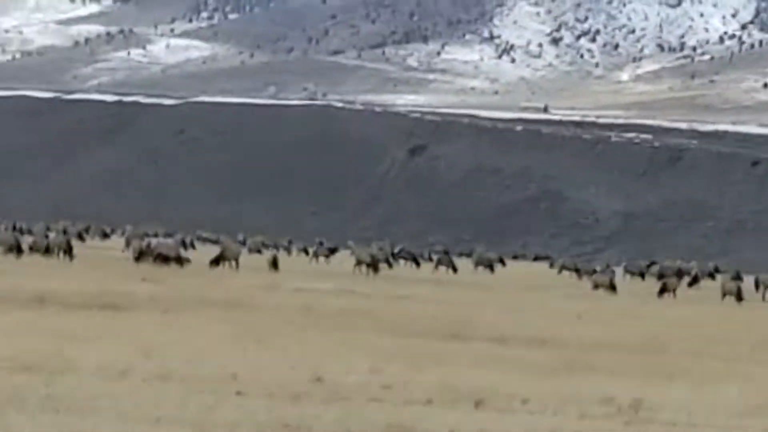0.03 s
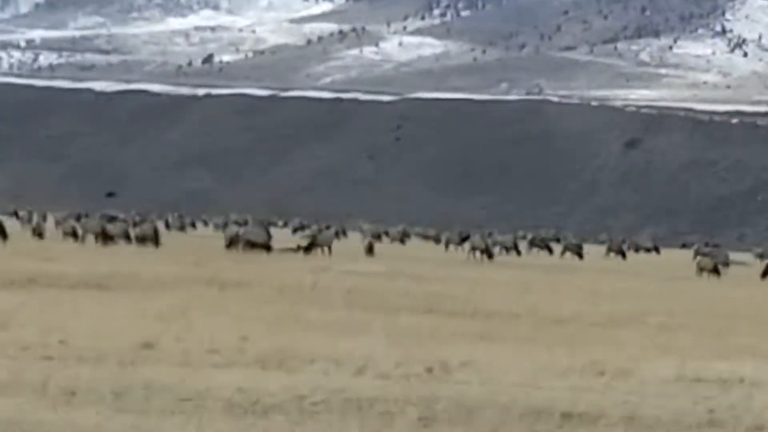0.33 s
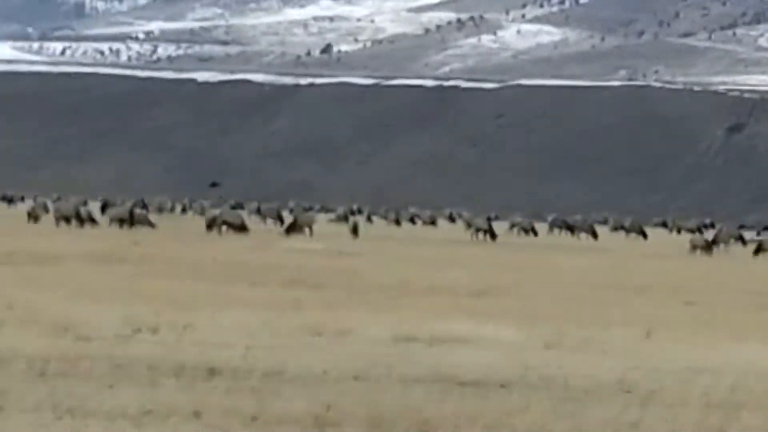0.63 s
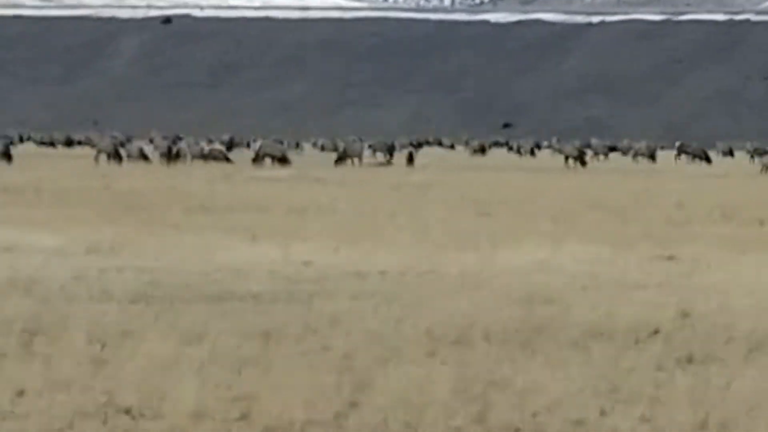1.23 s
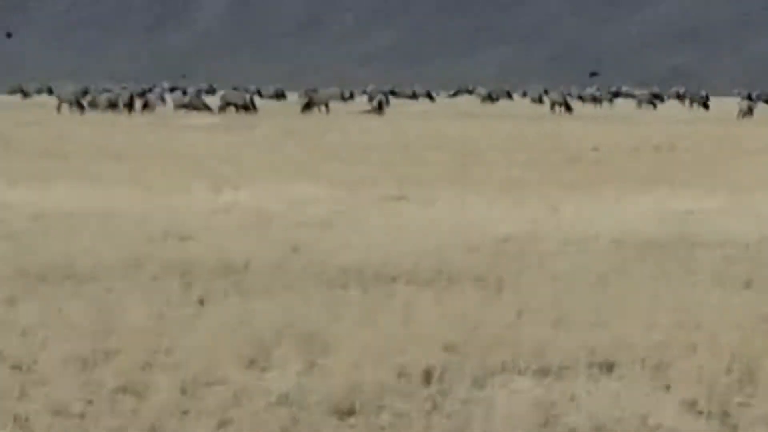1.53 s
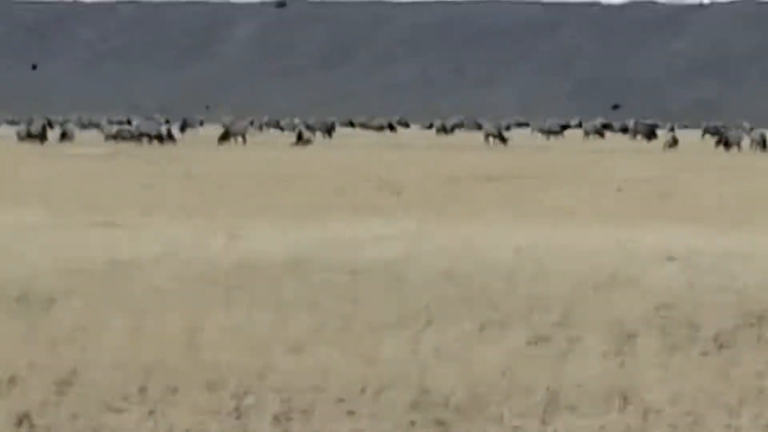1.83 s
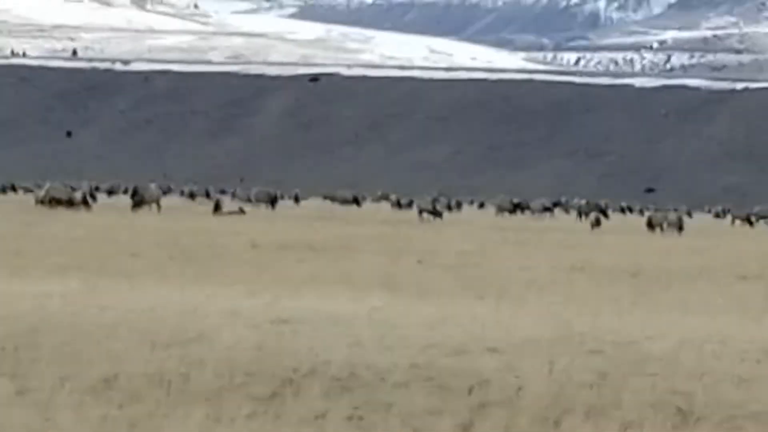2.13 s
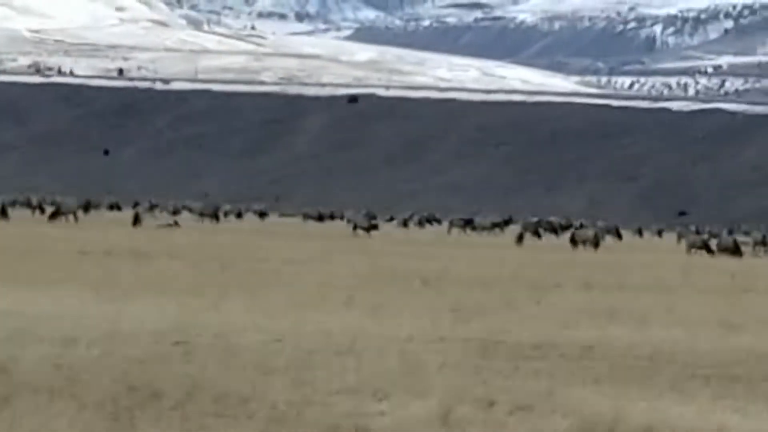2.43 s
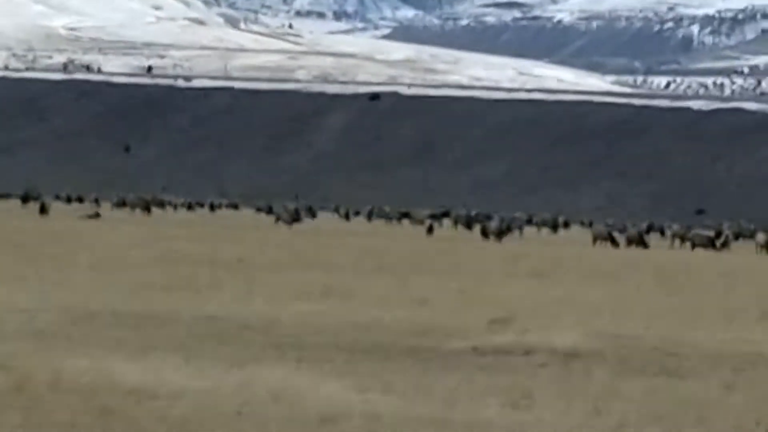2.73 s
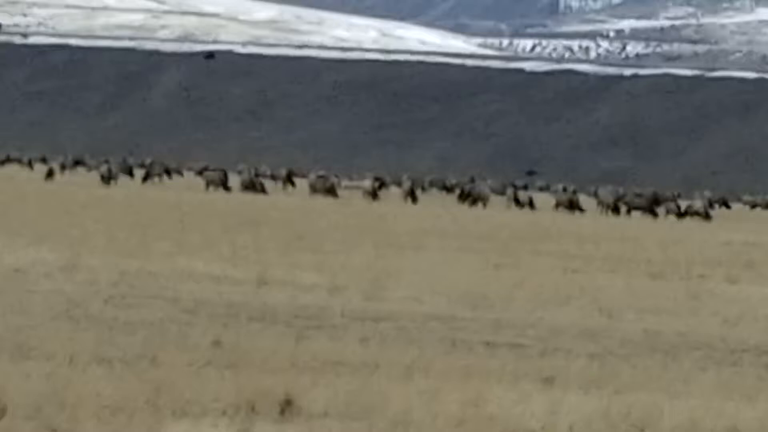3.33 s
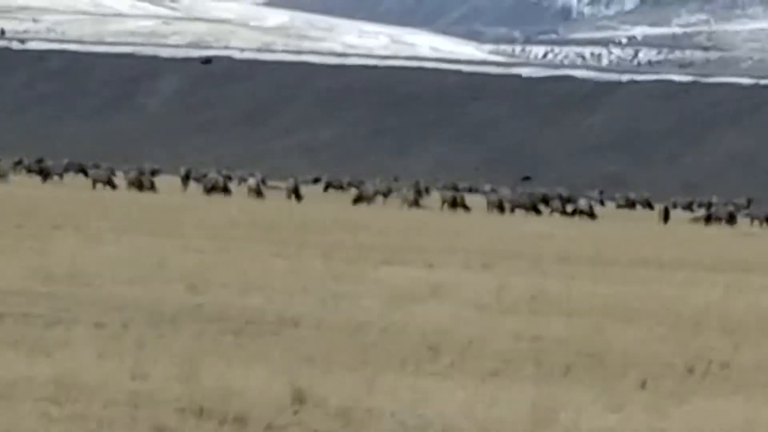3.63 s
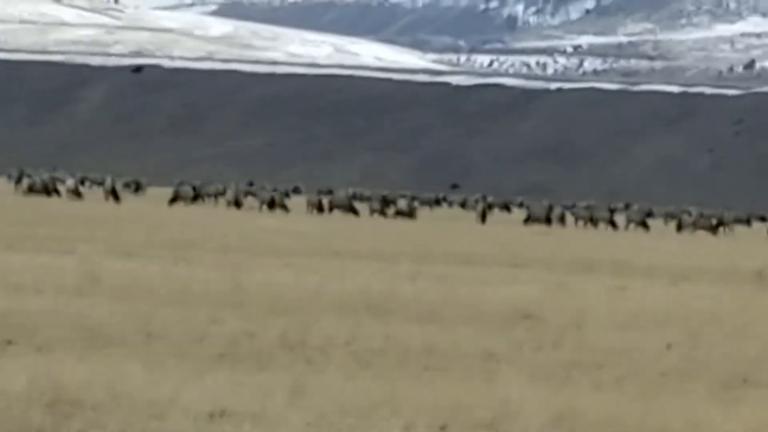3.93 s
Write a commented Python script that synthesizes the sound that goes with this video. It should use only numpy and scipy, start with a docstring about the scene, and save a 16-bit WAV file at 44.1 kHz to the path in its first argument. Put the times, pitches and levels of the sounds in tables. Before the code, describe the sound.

Inside a moving car, a deep cabin rumble and tyre roar carry on throughout, broken by many soft bumps. On the right are a light rush of air and very faint handling rustles and ticks at the microphone.

```python
"""Car cabin on a country road

Inside the rolling car, with a stereo microphone held in the hand. The uneven road shakes the body,
so the cabin booms all round, with many soft jolts; from below, the tyres drone and roar.
Air rushes by at the right-hand window. On the same side, right at the microphone,
the hand rustles and the casing ticks faintly."""
import sys
import numpy as np
from scipy import signal
from scipy.fft import rfft, irfft
from scipy.io import wavfile
from scipy.ndimage import uniform_filter1d

SR = 44100
rng = np.random.default_rng(int(sys.argv[2]) if len(sys.argv) > 2 else 0)


def generate_wav(signal):
    """Clip the signal to [-1, 1] and save it as 16-bit WAV at the path in sys.argv[1]."""
    frames = np.transpose(np.atleast_2d(signal))
    scaled = np.clip(frames, -1, 1) * 32767
    pcm = np.round(scaled).astype(np.int16)
    wavfile.write(sys.argv[1], SR, pcm)


N = 176400
t = np.arange(N) / SR


def undb(db):
    """Decibels to gain."""
    return 10 ** (np.asarray(db) / 20)


def level(x, db):
    """Scale to an rms level."""
    return x * undb(db) / np.sqrt(np.mean(x ** 2))


def swell(curve):
    """A (t/s, level/dB) curve for every sample, in dB about its mean."""
    db = np.interp(t, *np.array(curve).T)
    return db - db.mean()


def drift(rate_hz):
    """Smooth random wandering with an rms of 1."""
    hold = int(SR / rate_hz)
    steps = np.repeat(rng.standard_normal(N // hold + 1), hold)
    return level(uniform_filter1d(uniform_filter1d(steps, hold), hold)[:N], 0)


def colour(x, spectrum):
    """Filter by a (f/Hz, level/dB) spectrum."""
    hz, db = np.array(spectrum).T
    f = np.maximum(np.arange(N // 2 + 1) * SR / N, 1)
    return irfft(rfft(x) * undb(np.interp(np.log(f), np.log(hz), db)), N)


def noise(spectrum, db):
    """Coloured noise at an rms level."""
    return level(colour(rng.standard_normal(N), spectrum), db)


def resonate(x, hz, width):
    """A steep resonance: two passes through one peak, gain 1 at its centre."""
    b, a = signal.iirpeak(hz, hz / width, fs=SR)
    return signal.lfilter(b, a, signal.lfilter(b, a, x))


def shaken(modes):
    """Resonances kept ringing by random shaking."""
    return sum(level(resonate(rng.standard_normal(N + SR), hz, width)[SR:], db)
               for hz, width, db in modes)


def steady(x, amount=0.33):
    """Even out part of the random swelling."""
    envelope = uniform_filter1d(np.abs(signal.hilbert(x)), SR // 25)
    return x / envelope ** amount


def at_microphone(x, lag_s, right_lift_db=0.77):
    """A low sound reaches the left port later and weaker than the right."""
    left = np.interp(t - lag_s, t, x)
    return np.array([left * undb(-right_lift_db / 2), x * undb(right_lift_db / 2)])


# spectrum of the microphone's own noise: f/Hz, relative level/dB
HISS_SPECTRUM = [(1000, -3.5), (3400, -4), (3900, 10), (4500, -9.5), (7000, -8), (9000, -13.5), (12000, 5),
                 (15500, 0)]
def microphone_hiss():
    """Each side of the microphone adds its own faint hiss."""
    return np.array([noise(HISS_SPECTRUM, db=-80) for _ in range(2)])


# ticks right at the microphone: t/s, f/Hz, width/Hz, starting level/dB
CASING_TICKS = [(0.514, 6160, 2400, -62), (3.116, 4970, 600, -66.5)]
def casing_ticks(decay_s=0.0095):
    """The casing creaks in short ringing ticks."""
    return sum(shaken([(hz, width, db)]) * (t >= start) * np.exp(-np.abs(t - start) / decay_s)
               for start, hz, width, db in CASING_TICKS)


def skin_slips(per_s=6000, spread_db=1.5):
    """Skin slips in dense tiny clicks of uneven size."""
    clicks = (rng.random(N) < per_s / SR) * rng.choice([-1, 1], N)
    return clicks * undb(spread_db * rng.exponential(size=N))


# spectrum of skin rubbing on the microphone's casing: f/Hz, relative level/dB
RUB_SPECTRUM = [(800, -18.5), (2500, 8.5), (4400, -3), (6200, 3), (7000, -4), (7800, -0.5), (9200, -14.5),
                (10500, -10), (12600, -4), (15000, -11)]
# steady rubbing of the grip: t/s, relative level/dB
GRIP_LEVEL = [(0.08, -72.5), (0.35, -74.5), (0.44, -76), (0.46, -73), (0.77, -77), (1.04, -71), (1.77, -74),
              (1.79, -72.5), (1.96, -73.5), (2.2, -72), (2.28, -71.5), (2.87, -77), (3.13, -74),
              (3.21, -78), (3.54, -73.5), (3.92, -77)]
# scrapes as the grip shifts: t/s, length/s, attack/s, rub level/dB, rasp level/dB
SCRAPES = [(0.316, 0.089, .015, -68, -73), (0.45, 0.044, .01, -69, -77), (0.533, .06, .01, -69, -83),
           (1.763, 0.13, 0.036, -63, -65.5), (2.098, 0.17, 0.053, -65, -73)]
def hand_rustle(grip_db=-66.5, release_s=0.035):
    """Skin slips on the casing all the time, stronger and raspier when the grip shifts."""
    rub_power = undb(grip_db + swell(GRIP_LEVEL)) ** 2
    rasp_gain = 0
    for start, length, attack, rub_db, rasp_db in SCRAPES:
        shape = np.clip((t - start) / attack, 0, 1) * np.clip((start + length - t) / release_s, 0, 1)
        rub_power += (undb(rub_db) * shape) ** 2
        rasp_gain += undb(rasp_db) * shape
    rasp = rasp_gain * level(resonate(skin_slips(), hz=3080, width=2000), 0)
    rub = np.sqrt(rub_power) * level(colour(skin_slips(), RUB_SPECTRUM), 0)
    rasp *= undb(2.5 * drift(90))  # the rasp flickers more than the whole rustle
    return (rub + rasp) * undb(0.5 * drift(45))


# spectrum of air and road noise on the microphone's right: f/Hz, relative level/dB
RUSH_SPECTRUM = [(200, -9), (480, -8.5), (595, 0.5), (650, -1.5), (760, 1.5), (880, -3), (1100, -11.5),
                 (1480, -12.5), (2000, -16), (2600, -21.5), (3300, -31.5), (4400, -35.5), (6200, -35.5),
                 (9000, -48.5), (15000, -46)]
# rise and fall of the rush: t/s, relative level/dB
RUSH_SWELL = [(0.05, -51), (0.45, -53.5), (0.47, -51.5), (0.84, -52.5), (1.5, -52), (2.3, -50), (2.95, -48),
              (3.3, -49.5), (3.93, -50.5)]
# resonances of the space by the window: f/Hz, width/Hz, relative level/dB
WINDOW_MODES = [(590.6, 45, 3), (781, 100, -4), (1266, 110, -10), (1477, 150, -7), (2000, 63, -13.5)]
def window_rush(flutter_db=0.91):
    """Air and road noise from the side window, ringing and fluttering a little."""
    air = noise(RUSH_SPECTRUM, db=-44.5) + level(shaken(WINDOW_MODES), db=-52)
    return air * undb(swell(RUSH_SWELL) + flutter_db * drift(30))


# spectrum of the tread's roar, heard from inside: f/Hz, relative level/dB
ROAR_SPECTRUM = [(15, -20.5), (31, 2), (50, 3.5), (110, 4.5), (200, 8), (330, -0.5), (400, -0.3),
                 (465, -4.5), (530, -8), (700, -16.5), (860, -20), (1050, -28.5), (1500, -36),
                 (2000, -52.5), (2600, -62), (6000, -70.5)]
def tread_roar():
    """The roar of the tread spreads through the cabin and arrives unrelated left and right."""
    return np.array([noise(ROAR_SPECTRUM, db=-35) for _ in range(2)])


# air resonances inside the tyres: f/Hz, width/Hz, relative level/dB
TYRE_MODES = [(235.1, 31.5, -1), (259.56, 24.2, -0.5), (280.4, 16.9, -2.5), (470.2, 44, -24)]
# rise and fall of the drone in the cabin: t/s, relative level/dB before scaling by depth
DRONE_SWELL = [(0.03, -28), (0.13, -33), (.24, -28.5), (.33, -33.5), (.48, -26), (.58, -33), (.82, -30.5),
               (.92, -33.5), (1.0, -29), (1.42, -35), (1.52, -28.5), (1.72, -31), (1.85, -27.5),
               (1.98, -31.5), (2.14, -30.5), (2.2, -28), (2.4, -29), (2.57, -31), (2.75, -28.5),
               (3.07, -31.5), (3.2, -26.5), (3.3, -30), (3.4, -25.5), (3.51, -32.5), (3.57, -26.5),
               (3.64, -31), (3.7, -28.5), (3.93, -28)]
def tyre_drone(depth=1.2):
    """The air in the tyres rings at several close pitches."""
    return level(steady(shaken(TYRE_MODES)) * undb(depth * swell(DRONE_SWELL)), db=-28)


# the road holds the cabin's main resonance for a moment, then it sags: t/s, f/Hz, peak level/dB
HUM_PATH = [(.78, 80, -48), (0.871, 80.3, -18.5), (.92, 77.2, -12.5), (.96, 80.7, -22.5), (.99, 81.9, -18),
            (1.05, 82.3, -27.5), (1.14, 79.6, -22.5), (1.172, 80, -32), (1.21, 78, -16), (1.27, 63, -25.5),
            (1.34, 59, -41)]
def cabin_hum(waver=0.035, flicker_db=2):
    """The main cabin resonance swells into a wavering, uneven tone."""
    times, hz, db = np.array(HUM_PATH).T
    pitch = np.interp(t, times, hz) * (1 + waver * drift(25))
    gain = np.interp(t, times, undb(db), left=0, right=0) * undb(flicker_db * drift(45))
    return gain * np.sin(2 * np.pi * np.cumsum(pitch) / SR)


# low resonances of the cabin around the microphone: f/Hz, width/Hz, relative level/dB
CABIN_MODES = [(35.4, 8, -16), (50, 11, -20), (63.6, 21, -5), (79.9, 25.4, -2.5)]
# higher resonances of the body panels: f/Hz, width/Hz, relative level/dB
PANEL_MODES = [(123.9, 19.8, -8.5), (158.6, 34.5, -9)]
# shaking from the road: t/s, relative level/dB before scaling by depth
ROAD_SHAKE = [(0.02, -26), (0.07, -21.5), (0.13, -29), (0.18, -26.5), (0.26, -17), (0.38, -25),
              (0.6, -22.5), (0.75, -24.5), (0.9, -24.5), (1.28, -26), (1.37, -21.5), (1.6, -23),
              (1.68, -33.5), (1.73, -20), (1.83, -32), (1.96, -20.5), (2.13, -24), (2.42, -24),
              (2.66, -25.5), (2.8, -22.5), (3.1, -20), (3.18, -25), (3.27, -22), (3.4, -25), (3.52, -23),
              (3.72, -20.5), (3.84, -26), (3.96, -18)]
def cabin_boom(depth=0.58):
    """The road's roughness keeps cabin and panels ringing."""
    cabin = steady(shaken(CABIN_MODES)) * undb(depth * swell(ROAD_SHAKE))
    panels = steady(shaken(PANEL_MODES))
    return level(cabin, db=-23.5) + level(panels, db=-28.5)


# bumps passing under the car: t/s, peak level/dB
BUMPS = [(0.018, -11.5), (0.053, -13), (0.21, -13.5), (0.324, -14), (.497, -13.5), (0.667, -17),
         (1.549, -17.5), (1.623, -14.5), (2.183, -13.5), (2.272, -12.5), (2.326, -10), (2.47, -10.5),
         (2.548, -10.5), (2.727, -14), (2.915, -15), (2.951, -18.5), (3.397, -8), (3.434, -15),
         (3.613, -11.5), (3.886, -12.5)]
def road_jolts(push_s=0.0021, ring_time_ratio=0.9):
    """Each bump gives cabin and panels one soft push; their ringing builds and dies away."""
    push = t * np.exp(-2 * t / push_s)
    ring = sum(undb(db) * resonate(push, hz, width / ring_time_ratio)
               for hz, width, db in CABIN_MODES + PANEL_MODES)
    ring /= np.abs(ring).max()
    return sum(undb(db) * np.interp(t - start, t, ring, left=0) for start, db in BUMPS)


def scene():
    """Rumble all round the microphone; rush, rustle and ticks on its right."""
    mix = at_microphone(cabin_boom() + cabin_hum() + road_jolts(), lag_s=0.00035)
    mix += at_microphone(tyre_drone(), lag_s=0.00043)
    mix += tread_roar() + microphone_hiss()
    mix[1] += window_rush() + hand_rustle() + casing_ticks()
    return mix


def record(dry, fade_in_s=0.002, top_hz=15750):
    """The recorder opens without a click and cuts the highest treble."""
    opening = np.minimum(t / fade_in_s, 1)
    lowpass = signal.ellip(8, 0.2, 70, top_hz, fs=SR, output="sos")
    return signal.sosfilt(lowpass, dry * opening)


dry = scene()
out = record(dry)
generate_wav(out)
```